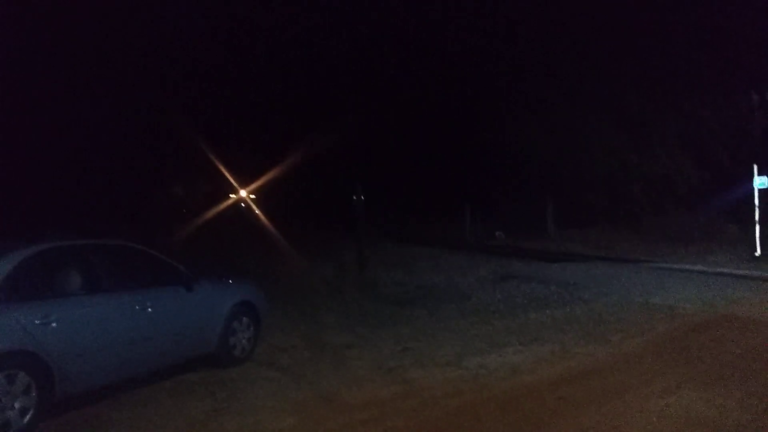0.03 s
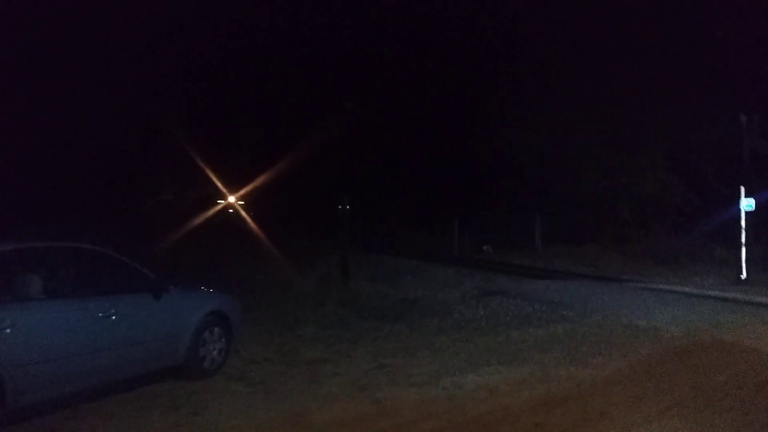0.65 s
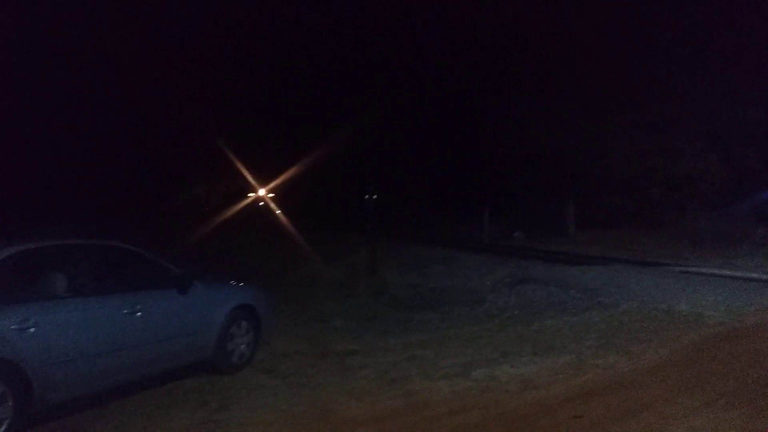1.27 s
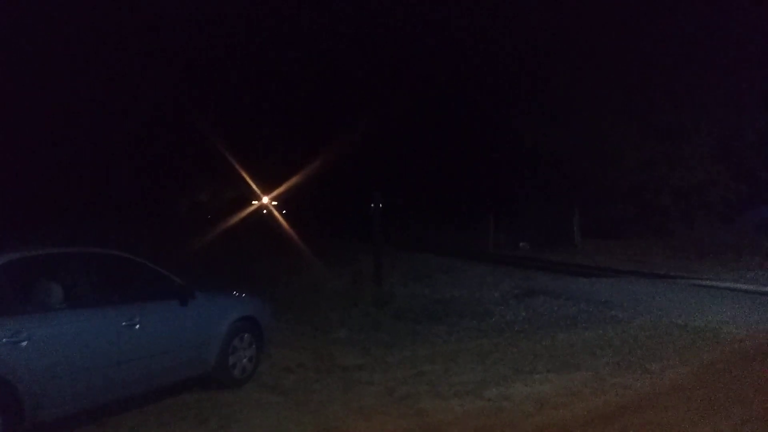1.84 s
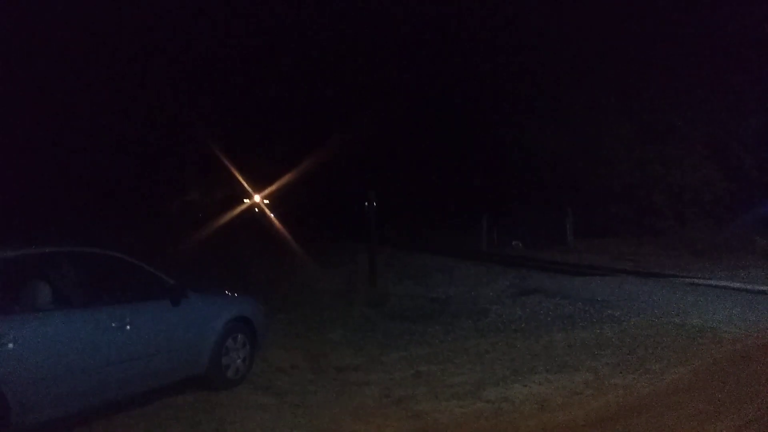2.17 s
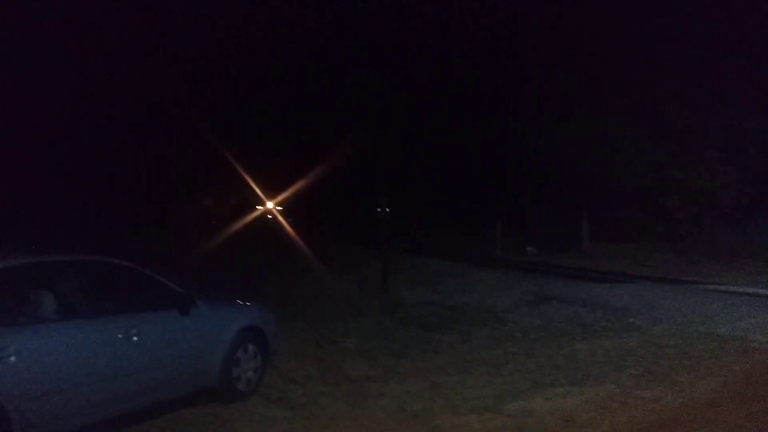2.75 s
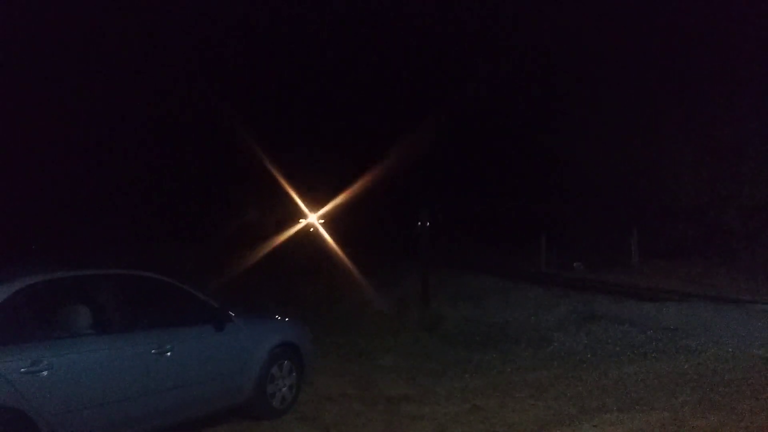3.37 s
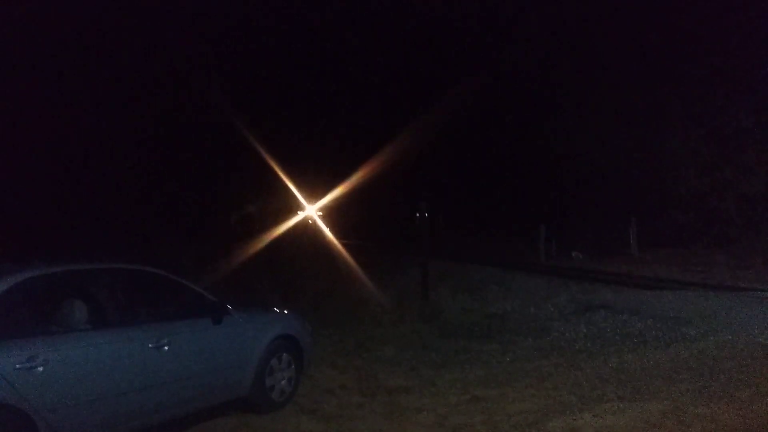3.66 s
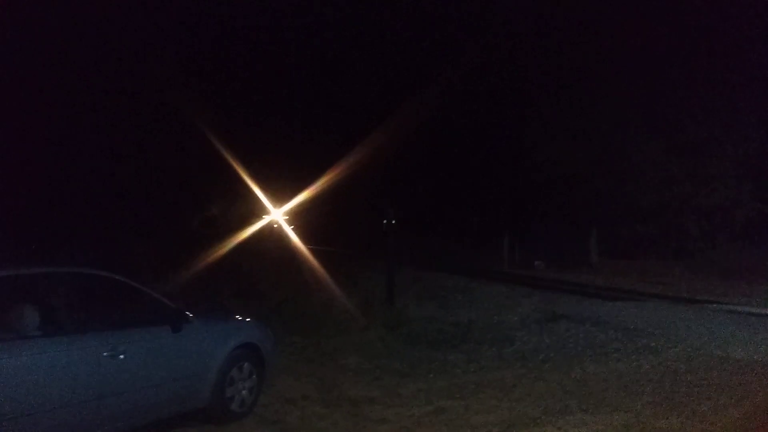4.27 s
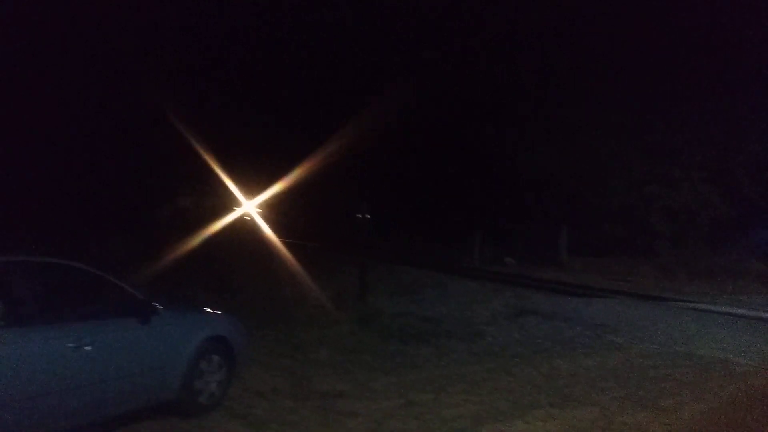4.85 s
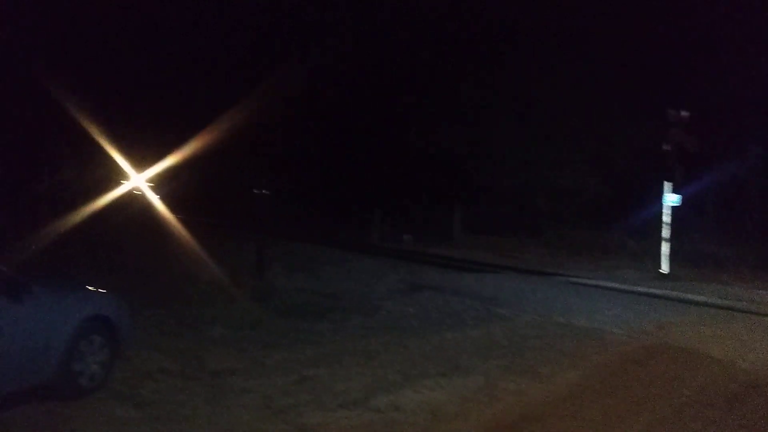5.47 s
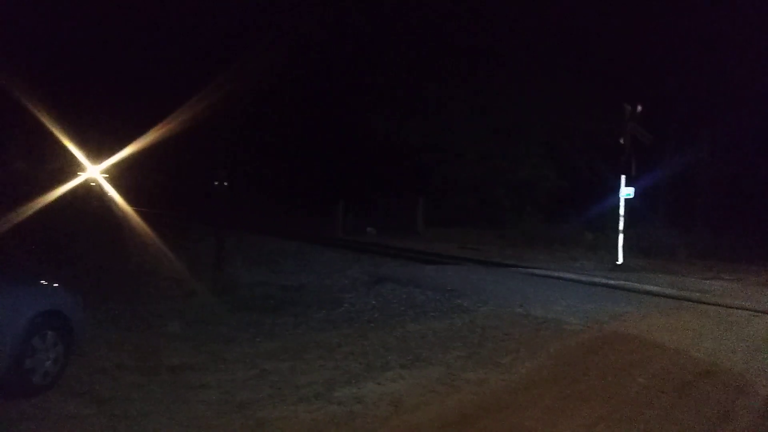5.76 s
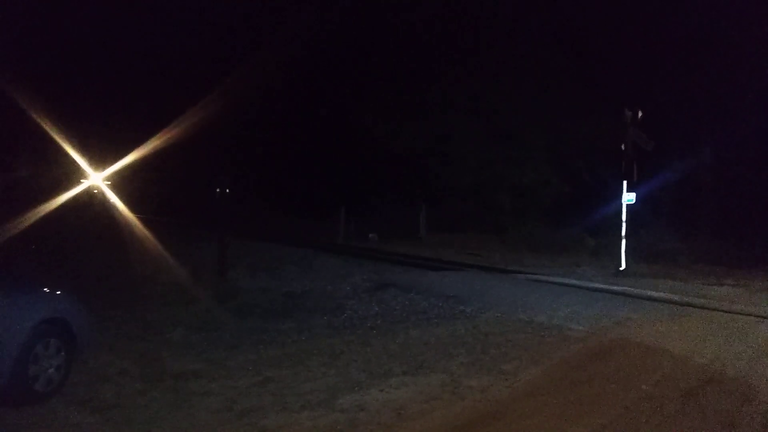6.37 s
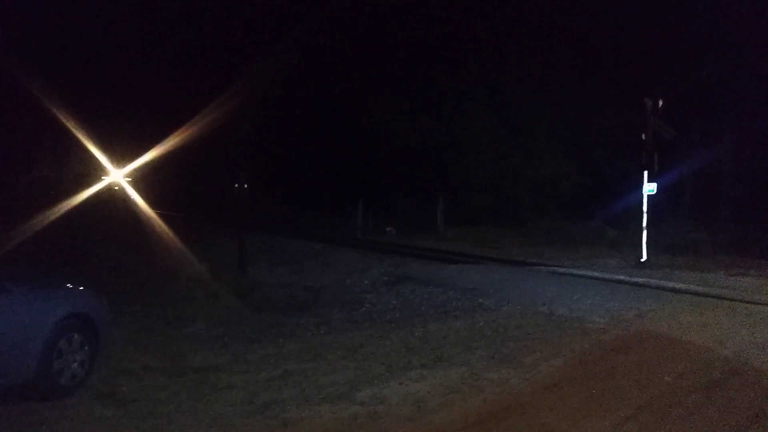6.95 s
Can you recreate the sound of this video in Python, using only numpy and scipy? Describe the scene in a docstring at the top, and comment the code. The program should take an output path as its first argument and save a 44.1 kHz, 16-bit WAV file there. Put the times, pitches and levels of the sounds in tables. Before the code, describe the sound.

A diesel freight train rumbles closer with a throbbing engine and roaring wheels, then gives a short, breathy air horn blast.

```python
"""A diesel freight train nears a road crossing in the open, slowly picking up engine speed.
Its cylinders fire unequally, so the exhaust booms in strong and weak throbs over a turbulent rumble.
Wheels roar, rails hiss and ring, a geared blower whines, and flange friction gives a scrape and a squeal.
Near the end compressed air drives a short horn blast, more rush than tone, which the trees scatter back."""
import sys
import numpy as np
from scipy import signal
from scipy.fft import rfft, irfft, next_fast_len
from scipy.io import wavfile
from scipy.ndimage import uniform_filter1d

SR = 44100
rng = np.random.default_rng(int(sys.argv[2]) if len(sys.argv) > 2 else 0)


def store_wav(level_fs):
    """Save 16-bit WAV to argv[1]."""
    pcm = np.round(np.clip(np.atleast_2d(level_fs), -1, 1) * 32767)
    wavfile.write(sys.argv[1], SR, pcm.T.astype(np.int16))


N = 313992
T = np.arange(N) / SR

# engine speed: t/s, four-stroke cycle rate/Hz
CYCLE_RATE = [(0, 3.165), (.6, 3), (1.3, 2.9), (2, 2.97), (2.7, 3.07), (4.2, 3.37), (6, 3.7), (7.12, 3.83)]


def exhaust(boom_order=17, stack_hz=60, pull=.75, lift_hz_per_db=.8, lead_s=.035, ease_s=.1):
    """Periodic firing excites engine orders; one booms in throbs, drawn towards the stack's resonance."""
    # weaker exhaust lines: multiple of the cycle rate, relative level/dB
    orders = [(13, -10), (15, -10), (19, -12), (21, -11), (24, -10), (28, -13), (32, -11), (36, -13),
              (44, -15)]
    cycle_hz, near = curve(CYCLE_RATE), nearness()
    order_hz = boom_order * cycle_hz
    swell = np.hypot(gain_of(-.4) * throbs(), gain_of(-10) * near)
    # pitch runs ahead of level, so each throb starts high and sags
    ahead = np.interp(T + lead_s, T, uniform_filter1d(swell, size=int(ease_s * SR)))
    surge_db = 20 * np.log10(ahead / uniform_filter1d(ahead, size=SR))
    boom_hz = order_hz + pull * (stack_hz - order_hz) + lift_hz_per_db * surge_db + 1.5 * drift(5.54)
    boom = swell * np.sin(phase_of(boom_hz))
    lines = sum(gain_of(db) * fuzzy_tone(order * cycle_hz, 1.7) for order, db in orders)
    return boom + gain_of(-5.5) * near * evened(lines)


def throbs():
    """Amplitude modulation by unequal firing: Gaussian swells of the boom add in power."""
    # strong and weak throbs, evening out at speed: t/s, half length/s, relative peak level/dB
    swells = [(0.104, 0.095, -36.5), (0.445, 0.0896, -39), (0.8, 0.073, -40), (1.112, 0.061, -42.5),
              (1.27, 0.084, -36.5), (1.478, 0.087, -32.5), (1.796, 0.096, -33.5), (2.116, 0.049, -31.5),
              (2.411, 0.037, -34.5), (2.575, 0.022, -36.5), (2.709, 0.044, -27.5), (2.891, 0.034, -29),
              (3.036, 0.053, -31.5), (3.163, 0.075, -31.5), (3.398, 0.043, -27.5), (3.545, 0.058, -36.5),
              (3.705, 0.057, -27.5), (3.874, 0.036, -32), (4.007, 0.047, -27), (4.13, 0.057, -32),
              (4.309, 0.054, -26), (4.434, 0.047, -31), (4.606, 0.053, -24.5), (4.727, 0.023, -29),
              (4.892, 0.058, -25.5), (5.009, 0.039, -29), (5.179, 0.076, -27.5), (5.34, 0.081, -32.5),
              (5.469, 0.055, -25.5), (5.585, 0.051, -31.5), (5.724, 0.063, -26), (5.856, 0.025, -28.5),
              (5.991, 0.097, -26.5), (6.146, .032, -28.5), (6.27, 0.11, -26.5), (6.353, 0.027, -27),
              (6.43, 0.031, -32), (6.536, 0.068, -25), (6.626, 0.053, -30), (6.745, 0.051, -26),
              (6.888, 0.048, -25.5), (7.043, 0.08, -27)]
    power = sum(gain_of(2 * db) * np.exp(-2 * ((T - s) / length) ** 2) for s, length, db in swells)
    return np.sqrt(power)


def nearness(start_db=-49, db_per_s=1.5067):
    """Spreading loss falls as the train closes in, so the exhaust's gain grows."""
    return gain_of(start_db + db_per_s * T)


def rumble():
    """Turbulence in the exhaust radiates low broadband noise."""
    # spectrum: f/Hz, relative density/dB
    spectrum = [(20, -57), (36, -44), (48, 4), (70, -2.5), (100, -3), (140, -4.5), (200, -8), (300, -18.5),
                (450, -26), (900, -38.5), (3000, -96)]
    # swell about the steady growth: t/s, relative level/dB
    swell = [(0, 1.2), (1, -0.3), (2.9, 0.2), (3.7, 1), (5, -1.3), (5.7, 1), (6.4, 0.5), (7.12, -0.5)]
    return gain_of(3 + curve(swell)) * nearness() * noise(spectrum, patchy_db=1.64)


def rolling(roar_db=-46, db_per_s=.7658, opening_db=-4, opening_s=.19):
    """Rolling contact vibrates wheel and rail: a roar that opens softly and grows, and a hiss."""
    # wheel roar and rail hiss: f/Hz, relative density/dB
    roar_spectrum = [(100, -25), (300, -6), (400, -5.5), (500, -1), (620, 1), (800, -3.5), (1000, -2.5),
                     (1400, -3.5), (1850, -10), (2150, -15.5), (2600, -28), (4000, -31), (9000, -70)]
    hiss_spectrum = [(700, -13), (950, 8.5), (1350, 3), (1800, 0.5), (2130, -5.5), (2450, 0.5),
                     (2750, -2.5), (3000, -4.5), (3800, -11), (4500, -10.5), (5200, -18), (6000, -23.5),
                     (8000, -29.5), (10000, -34), (14000, -49)]
    # course of the hiss: t/s, relative level/dB
    hiss_level = [(0, -64.5), (.3, -57.5), (.5, -59), (.6, -54.5), (2.1, -54), (2.5, -57), (3.4, -58),
                  (6.4, -59), (7.12, -52.5)]
    approach_db = roar_db + db_per_s * T + opening_db * np.exp(-T / opening_s)
    roar = gain_of(approach_db) * noise(roar_spectrum, patchy_db=2)
    hiss = gain_of(9 + curve(hiss_level) + .5 * drift(25)) * noise(hiss_spectrum, patchy_db=2)
    return roar + hiss


def horn(jet_growth=1.7, bells_growth=.47, build_s=.25, echo_db=-6):
    """Flow noise in bells that only half speak: the jet brightens with pressure, the low roar lingers."""
    # pushes of air: start t/s, length/s, relative peak pressure/dB
    pushes = [(6.557, 0.2, 2), (6.797, 0.1, -0.3)]
    # rushing air, jet and roar of the bells: f/Hz, relative density/dB
    rush_spectrum = [(200, -51), (600, -11), (1000, -4.5), (1600, 0.5), (2150, -3), (2400, -2), (2750, 0.5),
                     (3050, -7), (3600, -4.5), (3920, -3.5), (4200, -1.5), (4550, -5), (4900, -12),
                     (5400, -13.5), (6000, -18), (8000, -17.5), (10000, -36), (14000, -50)]
    jet_spectrum = [(1500, -15), (3000, -0.5), (4500, 3), (6200, -3), (8000, -11), (10000, -12),
                    (13000, -19), (14000, -24)]
    bell_spectrum = [(600, -37), (950, -4.5), (1300, -1), (1600, -1), (2000, 1), (2700, -3.5), (3300, -42)]
    # thin partials: f/Hz, relative level/dB
    partials = [(1190, -53), (1556, -59), (1705, -57.5), (2428, -50), (2555, -59), (2777, -59), (2860, -52),
                (2984, -57), (3117, -53), (3521, -57), (3797, -64), (3895, -50), (3957, -53), (4538, -67),
                (5109, -66), (5351, -59), (5642, -66)]
    pressure = np.max([push(*row) for row in pushes], axis=0)
    rush = gain_of(-38 + .6 * drift(40)) * noise(rush_spectrum, patchy_db=3)
    rush[0] += gain_of(-3) * sum(gain_of(db) * fuzzy_tone(hz, 6.2) for hz, db in partials)
    jet = gain_of(-47) * pressure ** jet_growth * noise(jet_spectrum, patchy_db=0)
    build = np.clip((T - pushes[0][0]) / build_s, 0, 1)
    bells = gain_of(-38) * build * pressure ** bells_growth * noise(bell_spectrum, patchy_db=5.5)
    blast = rush * pressure + jet + bells
    return blast + gain_of(echo_db) * trees(blast)


def push(start, length, db, attack_s=.014, hold_s=.056, swell_db_per_s=34, release_db_per_s=228):
    """A pressure transient: the valve snaps open, pressure builds, holds, then drains exponentially."""
    past_end = T - start - length
    below_db = np.maximum(-swell_db_per_s * (past_end + hold_s), release_db_per_s * past_end).clip(0)
    return np.clip((T - start) / attack_s, 0, 1) * gain_of(db - below_db)


def trees(x, t60_low=1.6, t60_high=1.0, delay_s=.03):
    """Scattering at the wood's edge returns a dense echo whose treble dies first."""
    taps = rng.standard_normal((2, SR)) * (np.arange(SR) > delay_s * SR)
    hz, t, spectra = signal.stft(taps, SR, nperseg=256)
    t60 = read([(1500, t60_low), (12000, t60_high)], hz)[:, None]
    tail = signal.istft(spectra * gain_of(-60 * t / t60), SR, nperseg=256)[1]
    return signal.fftconvolve(x, tail / np.linalg.norm(tail[0]), axes=1)[:, :N]


def blower(order=215.3):
    """A whine geared to the engine; scattering spreads a varying share of its power into a narrow band."""
    # course of the whine: t/s, level/dB
    level = [(0, -56.5), (.7, -55), (1, -55), (1.35, -49), (1.8, -58), (2.3, -52.5), (2.8, -57), (3.4, -54),
             (4.1, -57), (4.75, -53), (5.3, -56), (6, -55), (6.5, -52.5), (7.12, -50)]
    # scattering: t/s, share of the power
    scatter = [(0, .5), (1.3, .12), (2.5, .25), (4.7, .5), (5.8, .72), (7.12, .55)]
    hz, share = order * curve(CYCLE_RATE), curve(scatter)
    direct = evened(gain_of(drift(6.2)) * np.sin(phase_of(hz + 2.49 * drift(8.6))))
    return gain_of(curve(level)) * (np.sqrt(1 - share) * direct + np.sqrt(share) * fuzzy_tone(hz, 22))


def flanges(start_s=.48, attack_s=.11, hold_s=.27, db=-46.5, fade_db_per_s=13.5):
    """Sliding friction of flange on rail: a scrape that swells quickly, holds and slowly fades."""
    # scrape: f/Hz, relative density/dB
    spectrum = [(600, -33), (950, -10), (1300, 12), (1550, -1.5), (2100, -16), (2450, 2), (3000, -16),
                (3600, -12), (4200, -22), (5000, -18), (5700, -18.5), (6400, -21), (7300, -24.5),
                (8500, -46), (9600, -30), (10800, -34), (14000, -62)]
    age = T - start_s
    fade_db = fade_db_per_s * np.maximum(age - attack_s - hold_s, 0)
    level = np.clip(age / attack_s, 0, 1) * gain_of(db - fade_db + .78 * drift(28))
    return level * noise(spectrum, patchy_db=3)


def squeal(middle_s=1.07, half_length_s=.15, db=-45.5):
    """Flange friction briefly excites a cluster of close wheel modes."""
    # wheel modes: f/Hz
    modes = [930, 920, 980]
    hoot = evened(sum(fuzzy_tone(hz, width_hz=24) for hz in modes))
    return gain_of(db) * np.exp(-((T - middle_s) / half_length_s) ** 4) * hoot


def rails(middle_s=3.24, spread_s=3.2):
    """Rail resonances sing ahead of the wheels, swelling and then fading under the roar."""
    # rail modes: f/Hz, width/Hz, level/dB
    modes = [(1319, 18, -56.5), (1531, 14, -62), (1907, 52, -53), (2453, 21, -58), (2562, 16, -68.5)]
    ring = sum(gain_of(db) * fuzzy_tone(hz, width) for hz, width, db in modes)
    return ring * np.exp(-((T - middle_s) / spread_s) ** 2)


def wheel_discs(hz=1540, width_hz=150):
    """A broad resonance of the wheel discs emerges once they are near."""
    # course of the ringing: t/s, level/dB
    level = [(0, -74), (4, -72), (5, -53), (7.12, -54)]
    return gain_of(curve(level)) * fuzzy_tone(hz, width_hz)


def snap(at_s=2.1586, db=-20.5, hz=2100, half_length_s=.00029):
    """A Gaussian pulse only a cycle or two long is heard as one dry snap."""
    age = T - at_s
    return gain_of(db) * np.exp(-(age / half_length_s) ** 2) * np.sin(2 * np.pi * hz * age)


def ticks(rise_share=.049):
    """Exponentially damped noise bands make faint ticks, scuffs and squeaks; long ones enter softly."""
    # bursts: t/s, level/dB, centre f/Hz, width/octaves, T60/s
    bursts = [(.272, -53, 3720, 0.56, 0.1), (.498, -66.5, 9500, .3, 0.16), (.587, -64.5, 10500, .3, .12),
              (1.882, -54, 7000, 0.32, .012), (3.753, -49.5, 3400, .1, 0.089), (5.79, -59, 3450, .07, 0.25),
              (5.985, -53.5, 3460, 0.075, 0.74), (5.985, -67, 6300, 0.3, .65),
              (6.23, -57.5, 3500, 0.11, 0.97), (6.39, -59.5, 3450, .1, 1)]
    hz, pair = np.fft.rfftfreq(N, 1 / SR), np.zeros((2, N))
    for s, db, centre, octaves, t60 in bursts:
        band = np.exp(-.5 * (np.log2((hz + 1) / centre) / octaves) ** 2)
        age = np.maximum(T - s, 0)
        envelope = np.minimum(age / (rise_share * t60), 1) * gain_of(db - 60 * age / t60)
        pair += irfft(rfft(rng.standard_normal((2, N)) * envelope) * evened(band), N)
    return pair


def background(db=-77):
    """Broadband noise lies behind everything as a faint steady hiss."""
    # hiss: f/Hz, relative density/dB
    spectrum = [(2000, -5), (5000, -2.5), (9500, 1.5), (14000, -2.5)]
    return gain_of(db) * noise(spectrum, patchy_db=1.5)


def ports(pair, balance, comb_hz, dip, step):
    """Partial coherence: a shared and a diffuse row reach two ports, in and out of phase along a comb."""
    # likeness of left and right: f/Hz, coherence before the comb and the limit of 1
    likeness = [(40, 2.6), (130, 1), (250, 0.35), (370, 0.55), (600, 0.82), (1000, 1.05), (2100, 0.91),
                (4200, 0.86), (7400, 0.67), (12000, 0.7)]
    # phase offset under the comb: f/Hz, left lead/rad
    bass_lead = [(50, 0.99), (130, 0.75), (260, -0.11), (400, -0.4), (800, 0.36), (1100, -0.066)]
    size = next_fast_len(N + 4096)
    shared, diffuse = rfft(pair, size)
    hz = np.fft.rfftfreq(size, 1 / SR)
    angle = np.pi * np.maximum(hz / comb_hz - 1, 0)
    coherence = np.clip(read(likeness, hz) * (1 - dip * np.sin(angle) ** 2), 0, 1)
    lead = read(bass_lead, hz) + angle - step * np.sin(2 * angle)
    right = (coherence * shared + np.sqrt(1 - coherence ** 2) * diffuse) * np.exp(-1j * lead)
    tilt = gain_of(read(balance, hz) / 2)
    return irfft(np.array([shared * tilt, right / tilt]), size)[:, :N]


def noise(spectrum, patchy_db):
    """Spectral shaping: two uncorrelated noises of one colour share drifting patches of level."""
    frames, hz = N // 512 + 5, np.fft.rfftfreq(2048, 1 / SR)
    a, b, c, d, patches = rng.standard_normal((frames, len(hz), 5)).T
    patches = uniform_filter1d(patches, size=14, axis=1)  # smooth over time
    patches = evened(uniform_filter1d(patches, size=7, axis=0))  # and over frequency
    white = np.array([a + 1j * b, c + 1j * d])
    shaped = white * gain_of(read(spectrum, hz)[:, None] + patchy_db * patches)
    return evened(signal.istft(shaped, nperseg=2048, noverlap=1536)[1][:, :N])


def fuzzy_tone(hz, width_hz):
    """Random modulation of amplitude and phase broadens a tone into a narrow band."""
    phase = phase_of(hz)
    return evened(drift(width_hz) * np.cos(phase) + drift(width_hz) * np.sin(phase))


def drift(rate_hz):
    """Low-passed noise: a slow fluctuation of rms 1."""
    hz = np.fft.rfftfreq(N, 1 / SR)
    return evened(irfft(rfft(rng.standard_normal(N)) * np.exp(-(hz / rate_hz) ** 2), N))


def phase_of(hz):
    """Phase is the time integral of frequency."""
    return 2 * np.pi * np.cumsum(hz * np.ones(N)) / SR


def gain_of(db):
    """Amplitude ratio of a level in decibels."""
    return 10 ** (np.asarray(db) / 20)


def evened(x):
    """Normalisation to rms 1."""
    return x / np.sqrt(np.mean(x ** 2) + 1e-20)


def read(points, hz):
    """Interpolation on a log-frequency axis."""
    f, value = np.transpose(points)
    return np.interp(np.log(hz + 1), np.log(f + 1), value)


def curve(points):
    """Linear interpolation over time."""
    return np.interp(T, *np.transpose(points))


def scene():
    """Superposition of train, horn and faint hiss at the left and right ports."""
    # train, and horn standing to the left: f/Hz, left minus right level/dB
    train_balance = [(40, -8), (70, -6), (130, 1), (400, -1), (1000, -0.5), (1400, 3.5), (2200, 0),
                     (3000, 1), (3800, 2), (6000, 0), (12000, 3.5)]
    horn_balance = [(1000, 2.5), (1450, 6.5), (2500, -3), (3100, 3.5), (3900, -4), (4550, 9), (5300, -1),
                    (8000, 3), (10000, 8.5), (13500, 8)]
    train = rumble() + rolling() + flanges() + ticks()
    train[0] += exhaust() + blower() + squeal() + rails() + wheel_discs() + snap()  # the shared row
    blast = ports(horn(), horn_balance, comb_hz=1053, dip=.58, step=.48)
    return ports(train, train_balance, comb_hz=1060, dip=.47, step=.21) + blast + background()


def record(dry, low_cut_hz=40, high_cut_hz=14200):
    """Band limiting: steep filters remove the deepest bass and the highest treble."""
    hz = np.fft.rfftfreq(N, 1 / SR)
    high_passed = irfft(rfft(dry) / np.sqrt(1 + (low_cut_hz / (hz + 1)) ** 10), N)
    low_pass = signal.firwin(511, high_cut_hz, window=("kaiser", 9), fs=SR)
    return signal.oaconvolve(high_passed, low_pass[None], "same")


dry = scene()
out = record(dry)
store_wav(out)
```